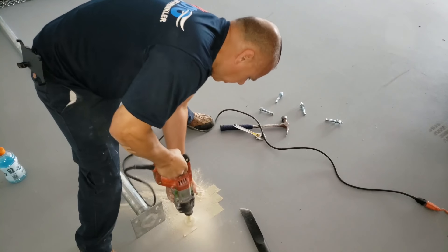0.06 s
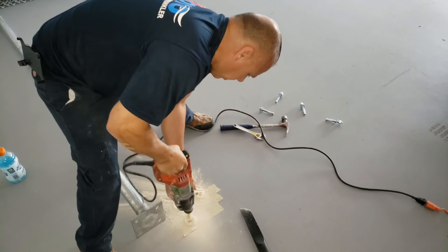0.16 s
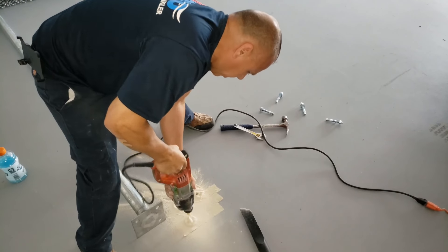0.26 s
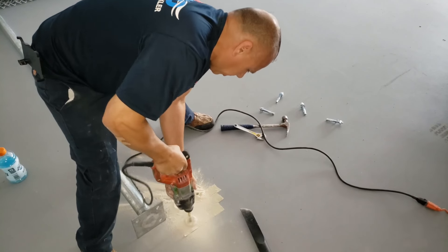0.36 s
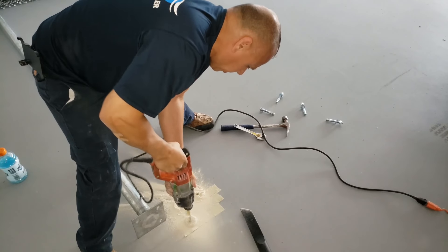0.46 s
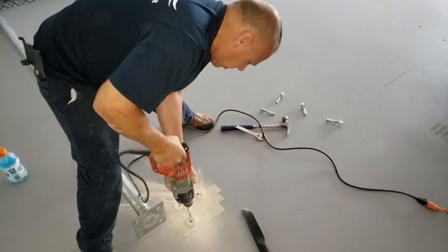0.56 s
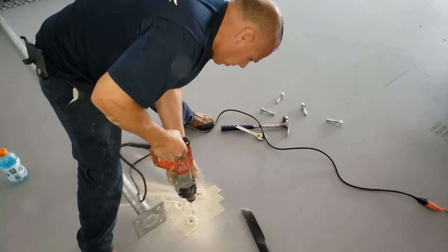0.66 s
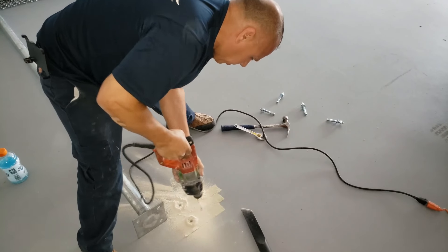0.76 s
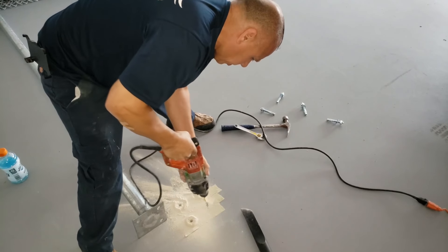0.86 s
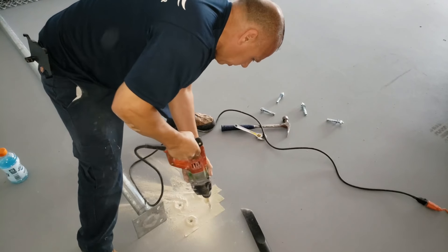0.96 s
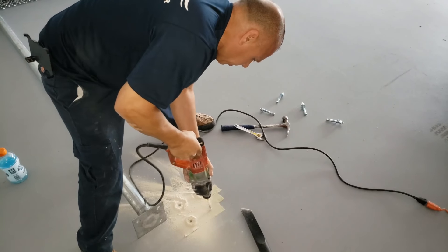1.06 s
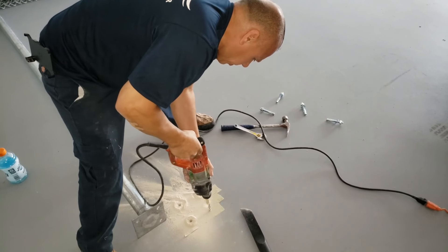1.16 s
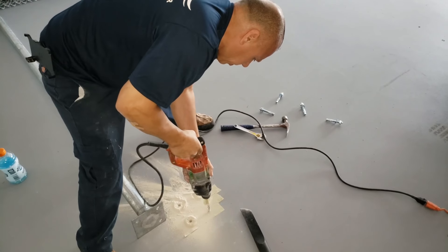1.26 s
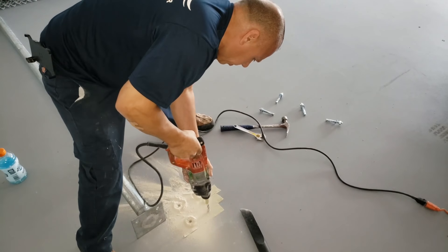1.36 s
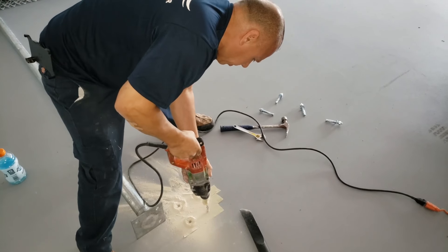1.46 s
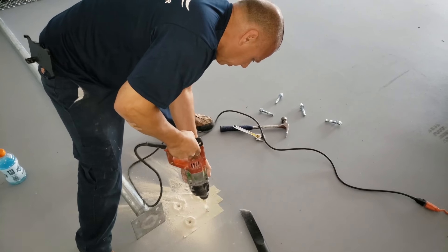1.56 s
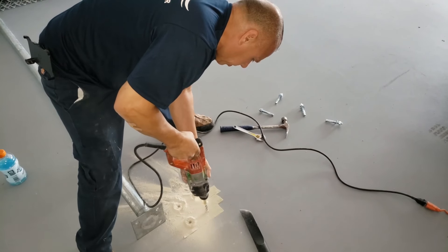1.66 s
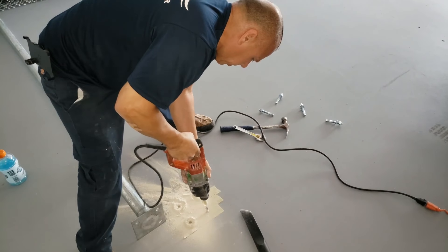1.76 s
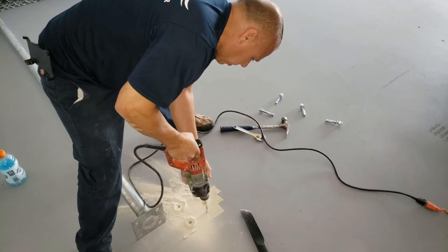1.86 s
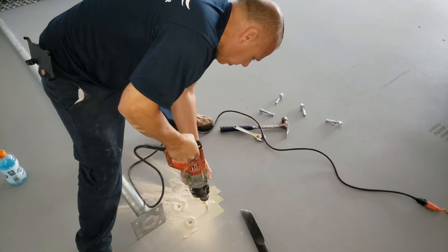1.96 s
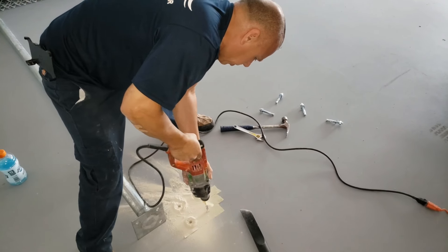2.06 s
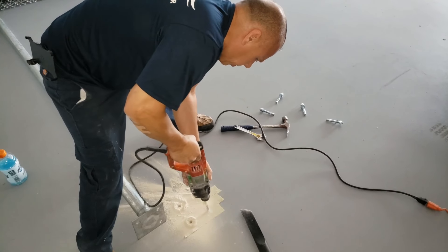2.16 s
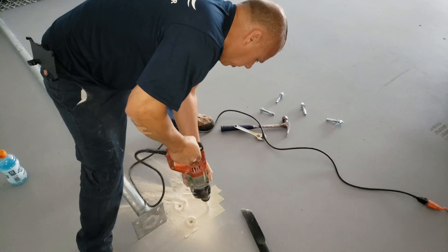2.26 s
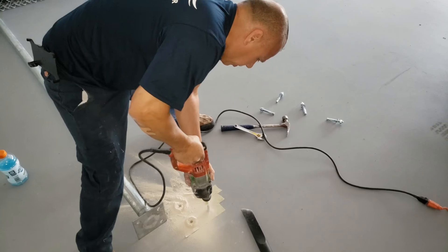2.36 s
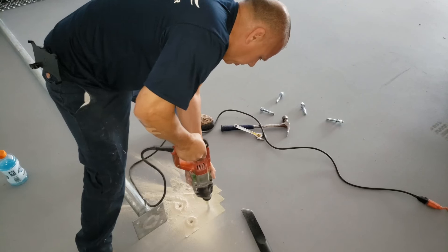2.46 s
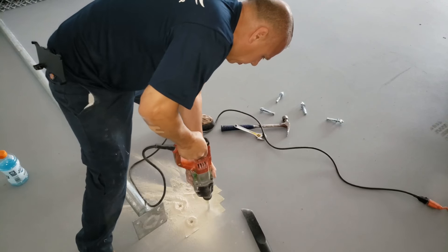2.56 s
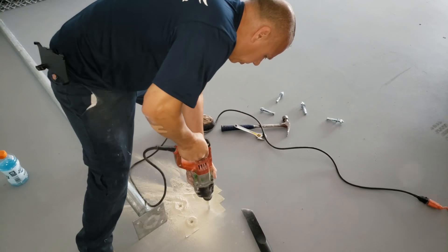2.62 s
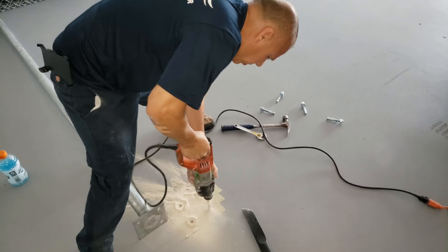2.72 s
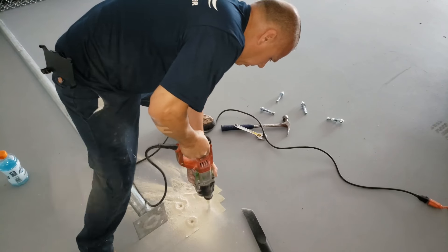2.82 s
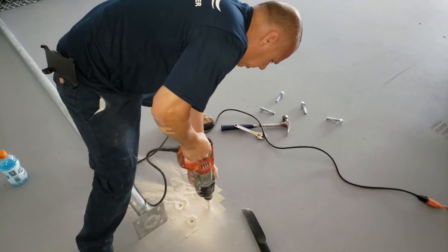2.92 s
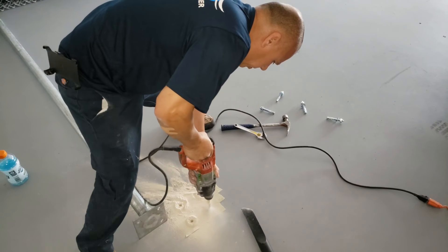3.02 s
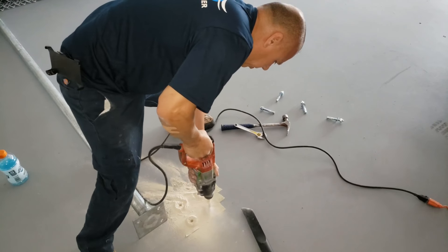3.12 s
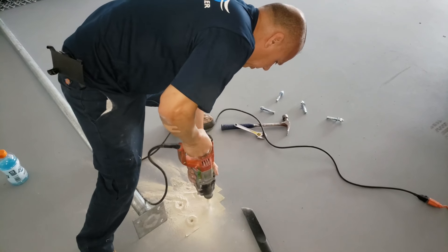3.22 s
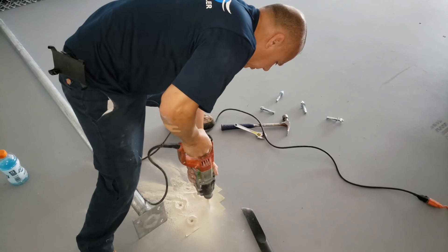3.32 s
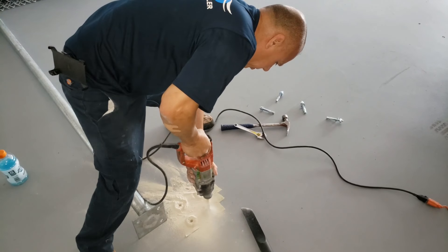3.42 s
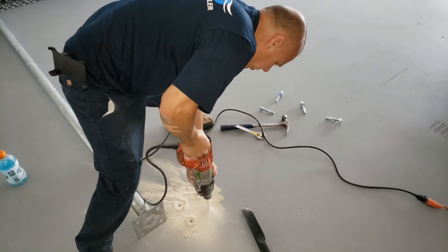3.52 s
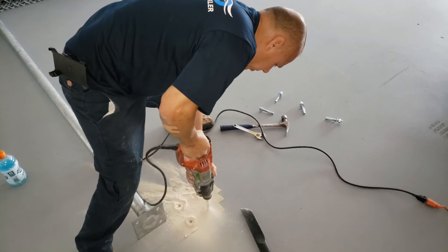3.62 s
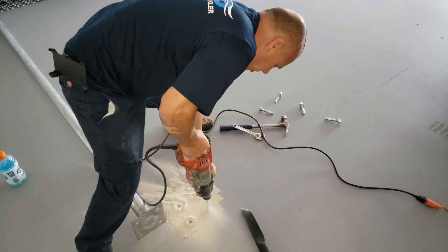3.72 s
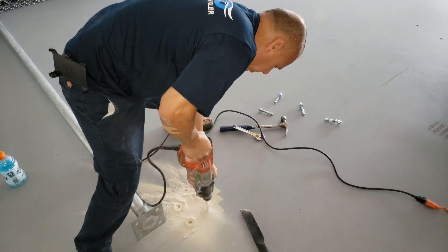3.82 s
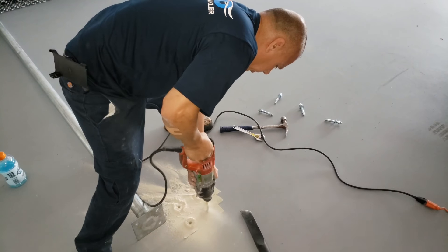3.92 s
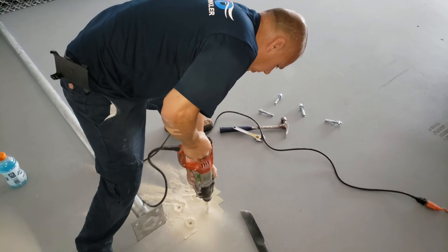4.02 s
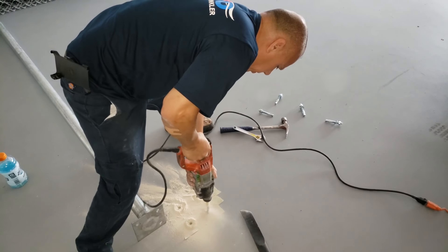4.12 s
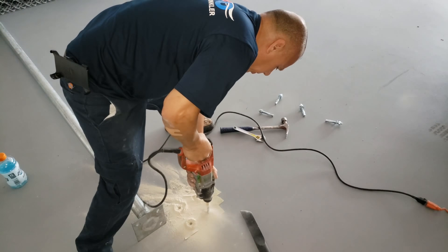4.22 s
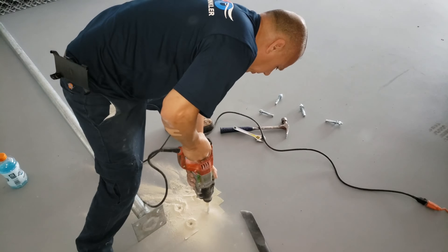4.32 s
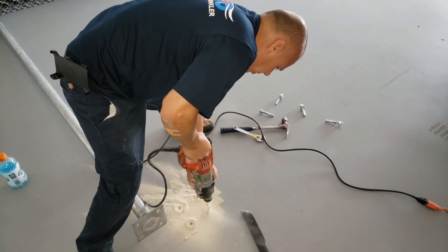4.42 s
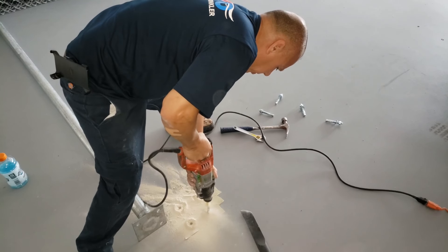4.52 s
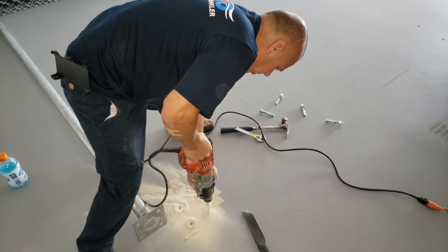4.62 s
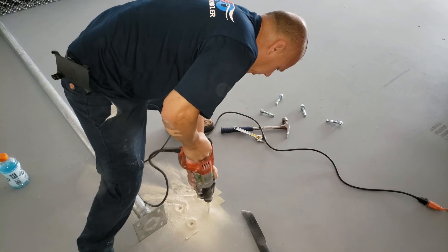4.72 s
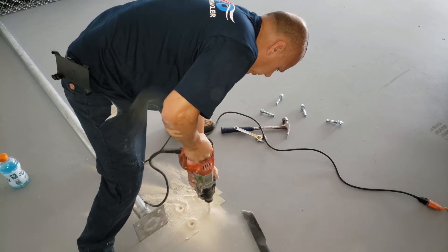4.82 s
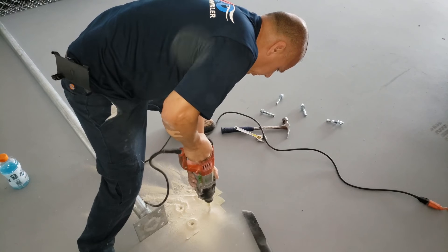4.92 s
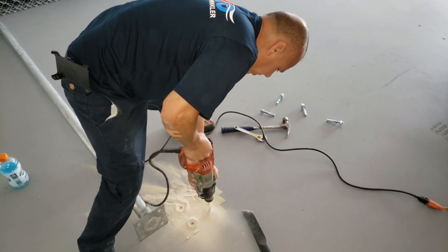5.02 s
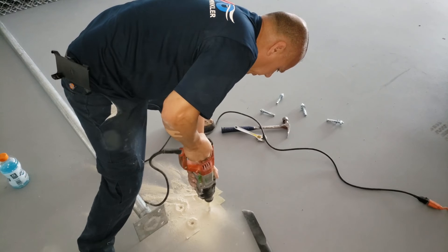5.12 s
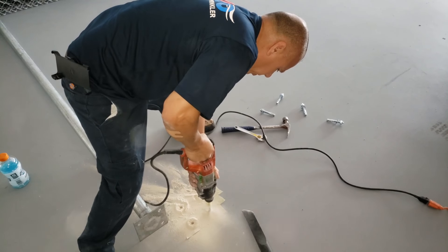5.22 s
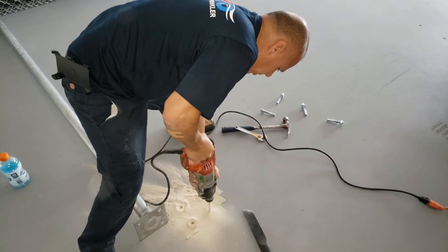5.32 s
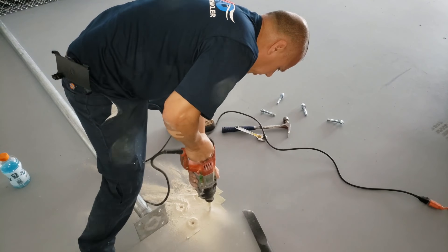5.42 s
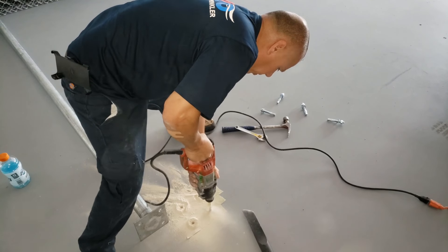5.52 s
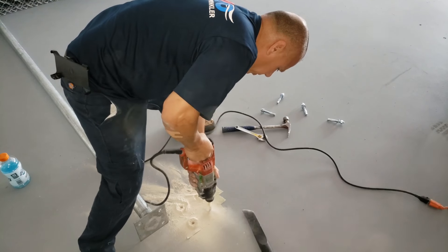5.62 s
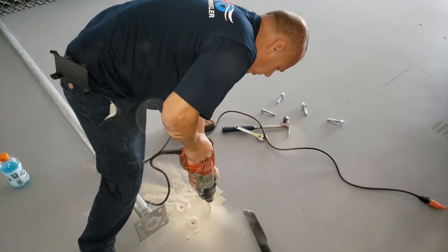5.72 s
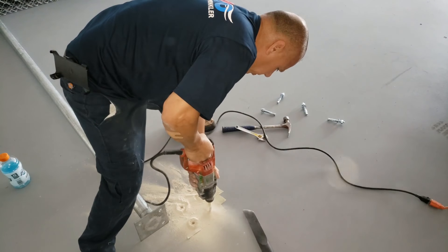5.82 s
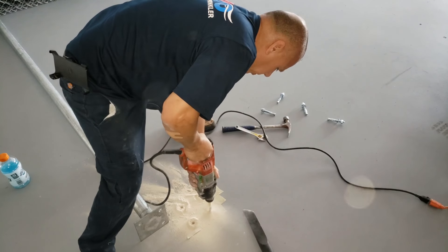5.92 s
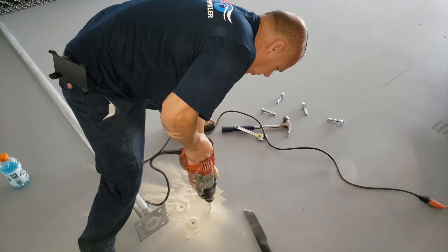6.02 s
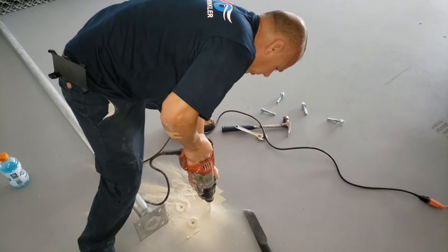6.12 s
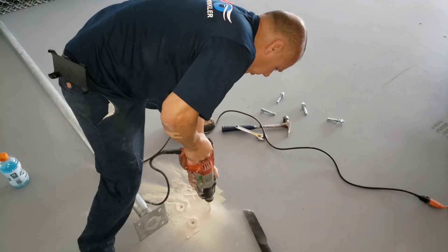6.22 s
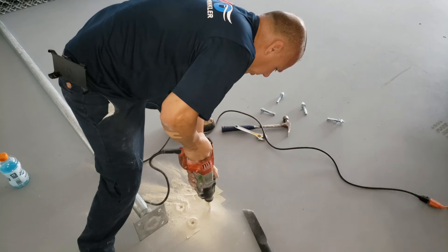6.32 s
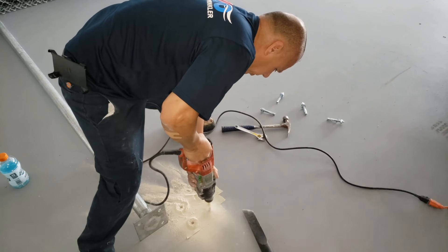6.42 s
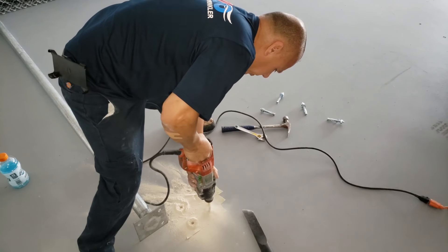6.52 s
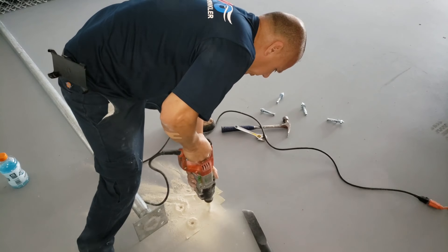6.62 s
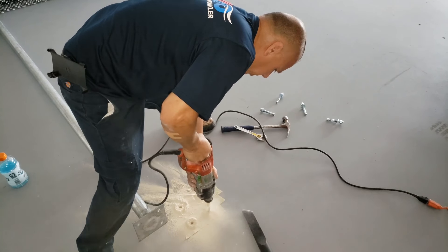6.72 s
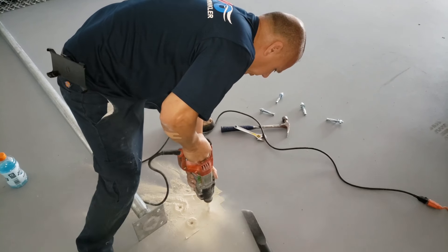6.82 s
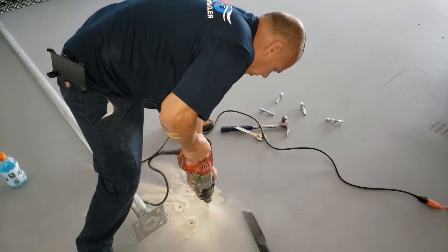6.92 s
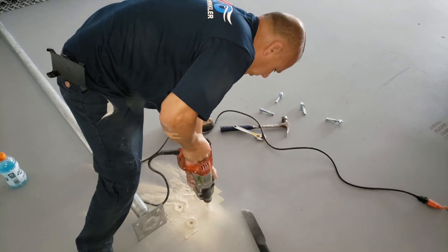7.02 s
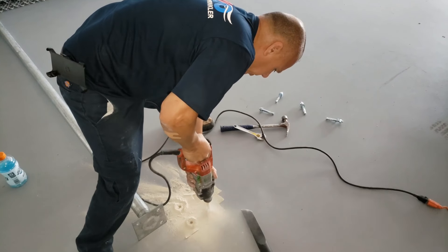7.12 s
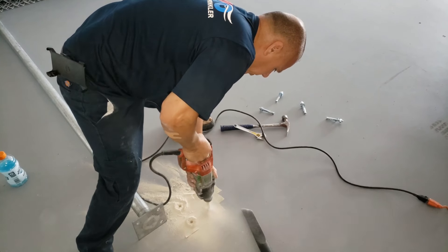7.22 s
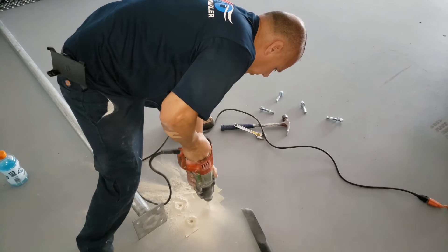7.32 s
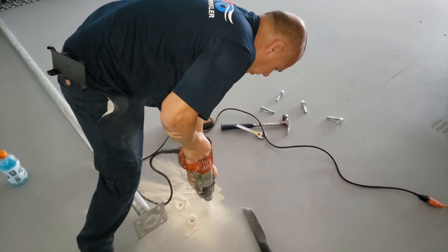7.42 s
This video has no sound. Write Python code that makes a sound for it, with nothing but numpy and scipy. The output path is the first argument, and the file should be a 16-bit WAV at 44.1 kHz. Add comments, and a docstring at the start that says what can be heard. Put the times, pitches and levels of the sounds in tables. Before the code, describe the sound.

A corded hammer drill lifts and whines down to rest, the bit clinks on concrete, then it restarts and hammers loudly into the floor.

```python
"""A corded hammer drill bores into a concrete floor in a bare room, about a metre from the microphones.
The bit is lifted and grazes the rim of its hole; the motor races, then coasts to rest as the gears tick.
The spindle is pushed home, the bit set down with a clink, and after a brief skate drilling resumes.
One rotor speed drives the ratchet blows, the high whine and the rush of the fan; noise makes the grit,
resonances the body of the drill, and decaying noise tails the echo of the walls."""
import sys
import numpy as np
from scipy import signal
from scipy.fft import rfft, irfft, next_fast_len
from scipy.io import wavfile
from scipy.ndimage import map_coordinates

SR = 44100
rng = np.random.default_rng(int(sys.argv[2]) if len(sys.argv) > 2 else 0)


def inscribe(sig):
    """Save sig as 16-bit PCM at rate SR to the path in sys.argv[1].

    A 1-D sig is mono; a 2-D sig holds one channel per row.
    Samples are clipped to [-1, 1] before scaling.
    """
    pcm = np.round(np.clip(np.atleast_2d(sig).T, -1, 1) * 32767)
    wavfile.write(sys.argv[1], SR, pcm.astype(np.int16))


N = 329427

# Stereo width of most sounds. Each row: frequency in Hz, side relative to mid in dB.
WIDTH = [(60, -14), (110, -11.5), (200, -12), (380, -10.5), (700, -5), (1290, -5), (2380, -3.5), (4400, 1),
         (8120, -1), (15000, -1)]
# Spectrum of cracking and scraped concrete. Each row: frequency in Hz, relative level in dB per Hz.
CRACK = [(150, -32), (400, -14.5), (700, -23.5), (1100, -13.5), (1600, -18.5), (1900, -5.5), (2300, -7),
         (3200, -6), (5000, -11), (7200, -4), (10000, -8), (12500, -2), (15400, 4), (16000, -5)]
# Spectrum of growling and rattling gears. Each row: frequency in Hz, relative level in dB per Hz.
GROWL = [(150, -25), (500, -10), (1200, -3), (2000, 1), (3200, -0.5), (5000, -13), (9000, -14),
         (15000, -10.5)]

WORKING_HZ = 372  # usual rotor speed under load, turns per second
ON_S = 2.14  # the trigger is pulled again (s)
SET_DOWN_S, PRESS_S = 2.215, 0.035  # the bit is set down on the floor: time, and how long it takes (s)


def amp(db):
    """Decibels to an amplitude factor."""
    return 10 ** (np.asarray(db) / 20)


def unit(x):
    """Scales a signal to rms 1."""
    return x / np.sqrt(np.mean(x ** 2) + 1e-20)


def along(points, hz):
    """Reads a curve of (Hz, value) points on a log frequency axis."""
    f, v = np.transpose(points)
    return np.interp(np.log(hz + 1), np.log(f + 1), v)


def curves(rows):
    """One value per sample for each column after the time."""
    s, *cols = np.transpose(rows)
    return [np.interp(np.arange(N) / SR, s, c) for c in cols]


def ramp(start, length):
    """Rises from 0 to 1 over length seconds."""
    return np.clip((np.arange(N) / SR - start) / length, 0, 1)


def swell(centre, half_length):
    """A bell curve of height 1 in time; it is down to 1/e at the half-length (s)."""
    return np.exp(-((np.arange(N) / SR - centre) / half_length) ** 2)


def wobble(rate):
    """A smooth random curve, rate knots a second."""
    knots = rng.standard_normal(int(N * rate / SR) + 4)
    return map_coordinates(knots, [np.arange(N) * rate / SR])


def filtered(x, response):
    """Filters x by a complex response of frequency."""
    m = next_fast_len(N + SR // 2)
    return irfft(rfft(x, m) * response(np.fft.rfftfreq(m, 1 / SR)), m)[..., :N]


def resonate(x, modes):
    """Passes x through a set of causal resonances: (Hz, width Hz, dB)."""
    def response(f):
        return sum(amp(db) * 1j * f * w / (c * c - f * f + 1j * f * w) for c, w, db in modes)
    return filtered(x, response)


def spread(pair, width=WIDTH):
    """Two unrelated signals become left and right, as wide as the width table says."""
    side = filtered(pair[1], lambda hz: amp(along(width, hz)))
    return np.array([pair[0] + side, pair[0] - side])


def noise(spectrum, width=WIDTH):
    """Stereo noise whose centre has rms 1."""
    def response(hz):
        return amp(along(spectrum, hz) + np.outer([0, 1], along(width, hz)))
    mid, side = filtered(rng.standard_normal((2, N)), response)
    return np.array([mid + side, mid - side]) / np.std(mid)


def impulses(times, sizes):
    """Single-sample pushes at the given times (s)."""
    return np.bincount(np.clip(np.round(times * SR).astype(int), 0, N), sizes, N + 1)[:N]


def bursts(pushes, life):
    """Every push starts an envelope that decays to 1/e in life seconds."""
    return signal.lfilter([1], [1, -np.exp(-1 / (life * SR))], pushes)


def rotor():
    """Speed in turns per second: powered, coasting against friction and drag, then spinning up again."""
    # Powered speed: it races as the bit is lifted and sags as the bit goes deeper.
    # Each row: time in seconds, turns per second.
    powered_speed = [(.09, 394), (.19, 428), (.25, 403), (2.65, 401.5), (3.05, 384), (3.85, 368.6),
                     (4.5, 374.7), (5.05, 372.4), (5.35, 369.5), (6.1, 367.7), (6.35, 370.5), (7.47, 372.4)]
    off_s, spin_up_s = .25, .09  # trigger released; time constant of the start
    # friction slows the rotor evenly to rest, and drag sheds the top of its speed early on
    friction_hz_per_s, rest_s, drag_hz, drag_s = 165, 2.04, 108, .13
    t = np.arange(N) / SR
    powered, = curves(powered_speed)
    friction = friction_hz_per_s * np.maximum(rest_s - t, 0)
    coasting = friction + drag_hz * np.exp((off_s - t) / drag_s)
    starting = powered * (1 - np.exp((ON_S - t) / spin_up_s))
    return np.select([t < off_s, t < ON_S], [powered, coasting], starting)


def hammer(turns, pressed):
    """Ratchet cams drive the bit down once a tooth: the body knocks, the concrete cracks, the bit rebounds."""
    # Drill body and slab under a blow. Each row: frequency in Hz, width in Hz, relative level in dB.
    body = [(67, 67, -7.5), (136, 44, -10), (299, 66, -3.5), (391, 125, -3.5), (430, 30, -2), (556, 56, -9),
            (835, 110, -16), (1085, 130, 0), (1280, 200, -8.5), (1880, 150, 2), (1990, 220, 1.5),
            (2600, 870, -7.5)]
    # How hard the drill is leant on. Each row: time in seconds, change of the blows in dB.
    feed = [(.1, -1), (2.52, 1.2), (2.8, 0), (3.4, 0), (4.1, -1.2), (5.3, .3), (7.47, .4)]
    # The tip scrapes over harder grains. Each row: time in seconds, scrape level in dB before the blows.
    hard_spots = [(.06, -28), (3.0, -30), (3.86, -24), (6.67, -30)]
    # Spectrum of the scraping tip. Each row: frequency in Hz, relative level in dB per Hz.
    scrape_spectrum = [(6000, -27), (10000, -9.5), (13000, 0), (16000, -2.5)]
    turns_per_blow = 5.4
    bite_s, bite_rise_s = 2.49, 0.011  # the skating bit bites: time, and how long it takes

    # until it bites the bit skates: weaker blows, more scrape
    skating = ramp(SET_DOWN_S - PRESS_S, PRESS_S) - ramp(bite_s, bite_rise_s)
    feed_db, = curves(feed)
    knock_db = -36 + feed_db - 2.5 * skating
    crack_db = -24 + feed_db - 9 * skating
    hard_grains = sum(amp(db) * swell(s, .07) for s, db in hard_spots)
    scrape = skating * amp(-24.5) + hard_grains

    teeth = turns / turns_per_blow
    tooth = np.arange(1, int(teeth[-1]))

    def when(phase):
        return np.interp(phase, teeth, np.arange(N) / SR)

    def level(x):  # rms 1 while the bit is pressed down
        return x / np.sqrt(np.average(x ** 2, weights=pressed))

    chance = rng.standard_normal((len(tooth), 5)).T
    strike = when(tooth + .005 * chance[0])
    rebound = when(tooth + .57 + .08 * chance[1])
    knock = level(resonate(impulses(strike, amp(1.86 * chance[2])), body))
    # the brittle crack also varies on its own from blow to blow; the ratchet limits how hard it can get
    force_db = 4 * np.tanh(.5 * chance[2] + .6 * chance[3])
    chips = impulses(strike, amp(force_db)) + impulses(rebound, amp(-8 + 2.5 * chance[4]))
    # grains give way over a millisecond or two
    crumble = level(bursts(bursts(chips, life=.0009), life=.0006))
    # between blows the flutes churn the grit
    churn = amp(-6.5 + 2 * wobble(90))
    grit = amp(crack_db + 0.79 * wobble(14)) * noise(CRACK) + scrape * noise(scrape_spectrum)
    return pressed * (amp(knock_db) * knock + np.hypot(crumble, churn) * grit)


def motor(pace, turns, pressed):
    """Fan rush grows steeply with speed; the rotor hums, its pinion sings under load, a whine rides far above."""
    # Spectrum of the fan rush. Each row: frequency in Hz, relative level in dB per Hz.
    fan = [(88, -56), (150, -22), (361, -7), (405, -13), (455, -11.5), (587, -14), (993, -8.5), (1230, -8),
           (2170, -2), (2390, -2.5), (5200, -6.5), (7250, -4), (8810, -6), (14900, -1), (15800, -9.5)]
    # Cavities of the motor housing. Each row: frequency in Hz, width in Hz, gain in dB.
    housing = [(270, 20, 0), (310, 24, 2), (364, 50, -5.5), (415, 14, -3)]
    # Resonance of the gear case. Each row: frequency in Hz, width in Hz, gain in dB.
    gear_case = [(1845, 120, 2.5)]
    # Whine at each pitch it passes through. Each row: pitch in Hz, mean level in dB.
    whine_levels = [(4800, -77), (6300, -59), (8000, -54), (9500, -62), (10800, -53), (11800, -31),
                    (14400, -32), (16000, -27)]
    pinion_teeth, whine_order = 5, 39  # cycles per turn

    rush = amp(-27.0 + 57 * np.log10(pace) + 1.46 * wobble(40)) * noise(fan)
    rush = rush * (1 + 0.19 * np.sin(2 * np.pi * turns))  # brushes rub hardest once a turn
    hum_db = -49 + 3 * wobble(10)
    shake = np.sin(2 * np.pi * turns + 0.21 * wobble(25))
    unbalance = np.minimum(pace, 1) ** 3 * amp(hum_db) * shake
    hum = resonate(unbalance, housing)
    mesh = np.sin(2 * np.pi * pinion_teeth * turns + .5 * wobble(20))
    pinion = resonate(pressed * amp(-41.5 + 2.6 * wobble(10)) * mesh, gear_case)
    whine_db = along(whine_levels, whine_order * WORKING_HZ * pace) + 1.5 * wobble(3)
    # the phase trembles, partly on its own in each channel, which frays the whine
    fray = .45 * np.array([wobble(200), wobble(200)]) + 1.1 * wobble(20)
    tone = np.sin(2 * np.pi * whine_order * turns + fray)
    whine = np.sqrt(2) * amp(whine_db + 2 * wobble(18)) * tone
    return rush + hum + pinion + whine


def gearbox(pace, turns):
    """Gears whirr, tick as they run slack, and growl under a rising armature tone as the rotor takes them up."""
    # Spectrum of the whirr. Each row: frequency in Hz, relative level in dB per Hz.
    whirr_spectrum = [(120, -41), (200, -13.5), (416, -13.5), (577, -8.5), (644, -11.5), (1040, -3),
                      (1580, -4.5), (1760, -1), (2890, -2), (3280, 0.5), (4900, -23), (7070, -5.5),
                      (9640, -13.5), (12000, -6.5), (15800, -10)]
    # Ticks of slack gear teeth. Each row: time in seconds, level in dB (all lowered alike below).
    slack_ticks = [(1.2379, -38), (1.6126, -33.5), (1.6949, -34), (1.7897, -36.5), (1.8111, -38),
                   (1.9179, -37.5), (1.9478, -38)]
    armature_slots = 12

    # level at working speed, and its growth per decade of speed; it fades out near rest
    whirr_db = -45.5 + 11 * np.log10(pace) + 2.1 * wobble(70)
    whirr = amp(whirr_db) * np.tanh(pace / 0.055)
    # torque of the start, greatest while the rotor is slow
    torque = (np.arange(N) / SR > ON_S) * np.maximum(1 - pace, 0)
    growl = amp(-20.5 + 1.7 * wobble(70)) * torque * pace ** 2
    # the armature's tone under the starting current, relative to the growl
    slots = amp(-5) * np.sin(2 * np.pi * armature_slots * turns + 0.88 * wobble(150))
    mesh = 1 + 0.27 * np.sin(2 * np.pi * turns)
    s, db = np.transpose(slack_ticks)
    ticks = bursts(impulses(s, amp(db - 6.5)), life=0.0056)
    return whirr * mesh * noise(whirr_spectrum) + (growl * mesh + ticks) * noise(GROWL) + growl * slots


def draught(pressed):
    """While the drill bores, air from its fan brushes the ports, now and then in a stronger puff."""
    # Spectrum of air on the ports. Each row: frequency in Hz, relative level in dB per Hz.
    buffet = [(15, -17), (35, -12.5), (60, 3), (90, -2), (150, -9), (250, -8.5), (600, -23), (2000, -80)]
    # Stereo width of that air. Each row: frequency in Hz, side relative to mid in dB.
    buffet_width = [(40, -1.5), (150, -1), (300, -4)]
    # The strongest puffs. Each row: time in seconds, level in dB.
    strong_puffs = [(2.28, -40.5), (2.76, -49), (2.93, -49), (3.25, -46), (3.39, -46), (4.23, -44),
                    (4.9, -39.5), (5.27, -43), (5.52, -43), (5.9, -43), (6.44, -38.5), (7.24, -47)]
    steady = amp(-54 + 2.2 * wobble(9)) * pressed
    puffs = sum(amp(db) * swell(s, 0.048) for s, db in strong_puffs)
    return np.hypot(steady, puffs) * noise(buffet, buffet_width)


def background():
    """A faint hiss and a low rumble fill the room; the rumble swells during the pause."""
    # Spectrum of the faint steady bed. Each row: frequency in Hz, relative level in dB per Hz.
    quiet = [(30, -5), (100, 4), (300, -12), (2000, -25), (6000, -10), (15000, -21)]
    # Spectrum of the low rumble. Each row: frequency in Hz, relative level in dB per Hz.
    rumble_spectrum = [(20, -13), (45, -4), (85, 1), (125, -1.5), (200, -10), (500, -22), (2000, -70)]
    # Stereo width of both. Each row: frequency in Hz, side relative to mid in dB.
    rumble_width = [(60, -27), (200, -24), (800, -5)]
    rumble = np.hypot(amp(-62), amp(-56.5) * swell(2, 0.41))
    return amp(-61) * noise(quiet, rumble_width) + rumble * noise(rumble_spectrum, rumble_width)


def room(x, count=20):
    """Bare walls return a diffuse tail, treble dying first; fresh noise tails keep any fixed tone from standing out."""
    # Decay of the room. Each row: frequency in Hz, time to fall 60 dB in seconds.
    decay = [(150, 0.48), (2000, 0.71), (8000, 0.48), (15000, 0.19)]
    # Colour of the echo. Each row: frequency in Hz, level in dB.
    colour = [(300, -9.0), (1200, -5.5), (2200, -4.0), (12000, 0.5)]
    hz, t, z = signal.stft(rng.standard_normal((count, 2, SR // 2)), SR, nperseg=256)
    tails = signal.istft(z * amp(-60 * t / along(decay, hz)[:, None]), SR, nperseg=256)[1]
    tails = tails / np.linalg.norm(tails[0, 0])
    # overlapping stretches of the sound each get their own tail
    hop = N // (count - 1) + 1
    source = np.pad(x.mean(axis=0), (hop, 2 * hop))
    fade = np.sin(np.pi * np.arange(2 * hop) / (2 * hop))
    wet = np.zeros((2, N + 3 * hop + SR))
    for k, tail in enumerate(tails):
        stretch = fade * source[k * hop:(k + 2) * hop]
        answer = signal.fftconvolve(stretch[None], tail, axes=1)
        wet[:, k * hop:k * hop + answer.shape[1]] += answer
    return spread(filtered(wet[:, hop:hop + N], lambda f: amp(along(colour, f))))


def graze():
    """The lifted bit, slowing, rubs the rim of the hole: grit scrapes and the steel sings."""
    # The singing steel. Each row: frequency in Hz, width in Hz, relative level in dB.
    squeal = [(10000, 260, 0)]
    scrape = amp(-30 + 1.5 * wobble(90)) * swell(0.32, 0.077) * noise(CRACK)
    steel = spread(unit(resonate(rng.standard_normal((2, N)), squeal)))
    return scrape + amp(-42) * swell(.38, 0.14) * steel


def bit_contacts(pressed):
    """The free bit clinks on the concrete and rings until it is pressed down."""
    # Touches on the concrete. Each row: start in seconds, tick level in dB (all lowered alike below),
    # ring level in dB.
    clinks = [(.343, -5, -52), (.365, -7, -50), (2.016, -22, -48), (2.193, -10, -38), (2.219, -7, -28),
              (2.241, -13, -40)]
    # Ringing of the steel bit. Each row: frequency in Hz, relative level in dB, time to fall 60 dB in seconds.
    bit = [(8255, -3, .4), (9313, 0, .6), (10060, -7, .15), (12720, -12, .3), (12900, -7, .45)]
    # Spectrum of the tip's tick. Each row: frequency in Hz, relative level in dB per Hz.
    tip = [(100, -90), (1000, -6), (5000, -12.5), (8500, -3.5), (15000, 1)]
    t = np.arange(SR // 2) / SR
    hz, level, t60 = np.transpose(bit)[:, :, None]
    ring = np.zeros(N + SR)
    for start, _, ring_db in clinks:
        envelope = amp(ring_db + level - 60 * t / t60)
        steel = envelope * np.sin(2 * np.pi * (hz * t + rng.random(hz.shape)))
        ring[round(start * SR):][:len(t)] += steel.sum(axis=0)
    s, db, _ = np.transpose(clinks)
    tick = bursts(impulses(s, amp(db - 6)), life=.003) * noise(tip)
    return ring[:N] * (1 - pressed) + tick


def seating():
    """The spindle is pushed home: a knock in the chuck, and a short rattle of the gears behind it."""
    # The push. Each row: time in seconds, level in dB.
    seat = [(2.033, -24)]
    # Resonances of the chuck. Each row: frequency in Hz, width in Hz, relative level in dB.
    chuck = [(990, 43, -5), (1340, 110, 5), (2000, 370, -19), (2600, 390, -15), (4300, 780, -24)]
    s, db = np.transpose(seat)
    push = impulses(s, amp(db))
    knock = resonate(push, chuck)
    knock = knock / np.abs(knock).max() * amp(db[0] + 8)  # peak 8 dB above the push
    rattle = amp(-7) * bursts(push, life=0.0048) + amp(-18.5) * bursts(push, life=0.029)
    return knock, rattle * noise(GROWL)


def scene():
    """The rotor turns everything; blows and contacts echo from the walls; stray air brushes the ports."""
    lift_s, release_s = 0.13, 0.024  # the bit has left the floor; how long the release takes
    speed = rotor()
    pace, turns = np.maximum(speed, 1) / WORKING_HZ, np.cumsum(speed) / SR
    pressed = 1 - ramp(lift_s - release_s, release_s) + ramp(SET_DOWN_S, PRESS_S)
    knock, rattle = seating()
    impacts = hammer(turns, pressed) + gearbox(pace, turns) + graze() + bit_contacts(pressed) + rattle
    echo = room(impacts + amp(-16) * knock)  # only a share of the chuck's knock reaches the walls
    return impacts + knock + echo + motor(pace, turns, pressed) + draught(pressed) + background()


def record(dry):
    """Each microphone port has its own colour; a steep cut removes what lies above the band limit."""
    # Difference of the two ports. Each row: frequency in Hz, left relative to right in dB.
    port_balance = [(100, -3), (400, 1), (1100, 0.5), (2000, -2), (2900, -3), (4200, 3), (5500, 10.5),
                    (6700, 13.5), (8100, -2), (9300, -1), (10600, 7.5), (12000, 2), (13500, 3), (14400, -2),
                    (15400, -2)]
    top_hz = 15850

    def ports(hz):
        gains = amp(np.outer([.5, -.5], along(port_balance, hz)))
        even_power = gains / np.sqrt(np.mean(gains ** 2, axis=0))
        return even_power / np.hypot(1, (hz / top_hz) ** 200)
    return filtered(dry, ports)


dry = scene()
out = record(dry)
inscribe(out)
```